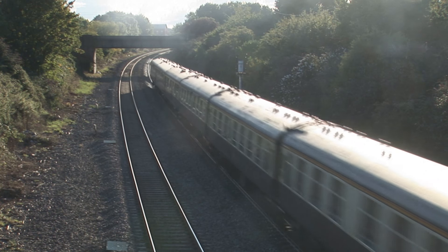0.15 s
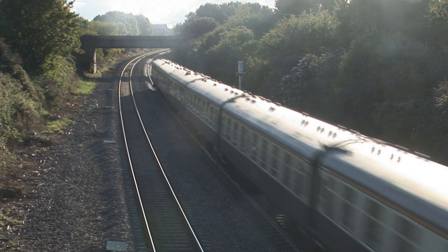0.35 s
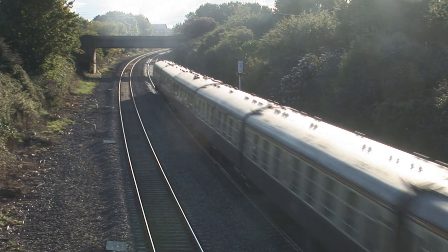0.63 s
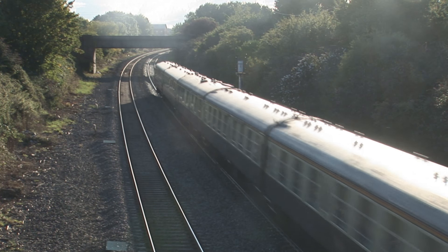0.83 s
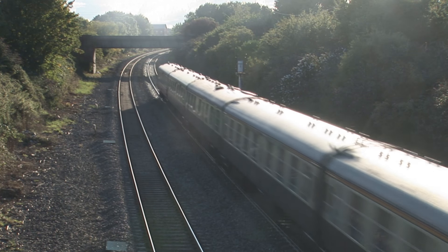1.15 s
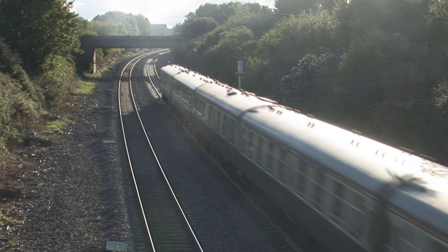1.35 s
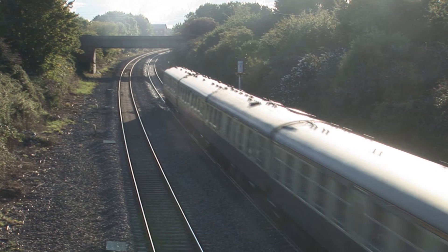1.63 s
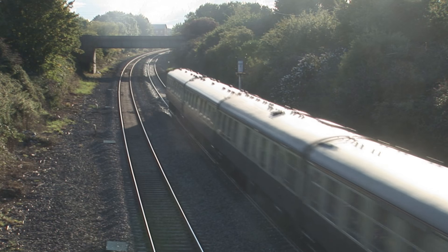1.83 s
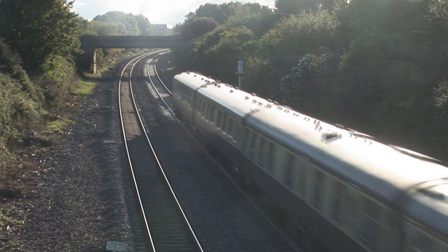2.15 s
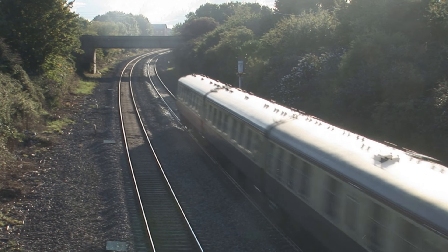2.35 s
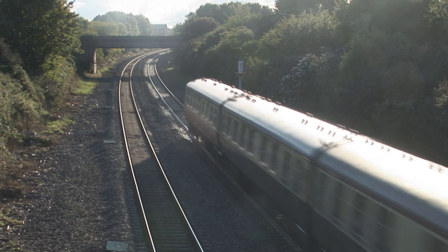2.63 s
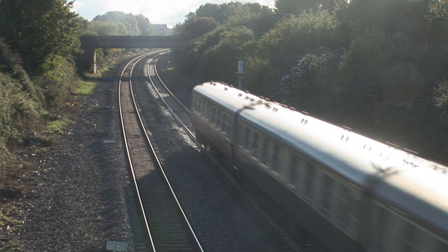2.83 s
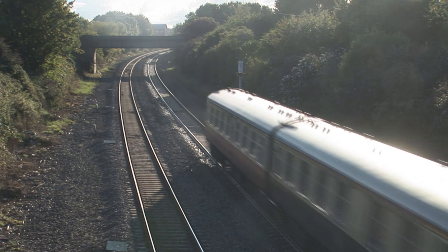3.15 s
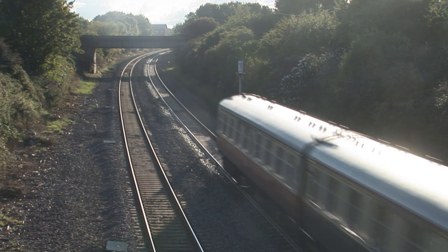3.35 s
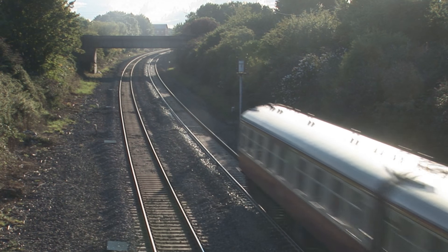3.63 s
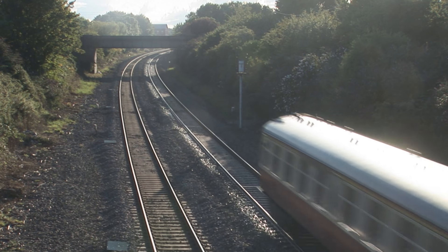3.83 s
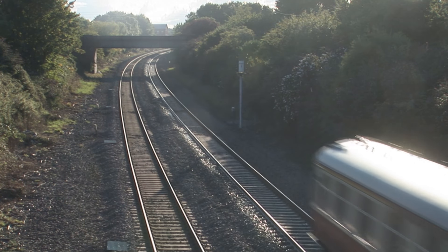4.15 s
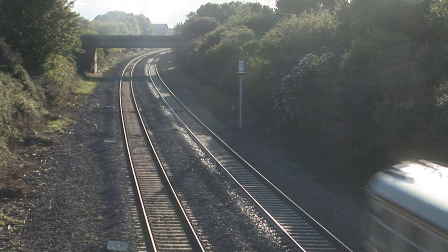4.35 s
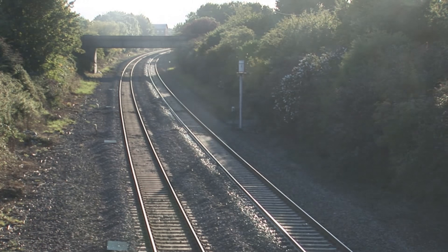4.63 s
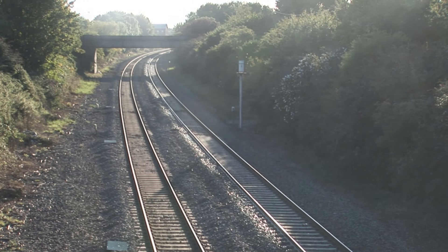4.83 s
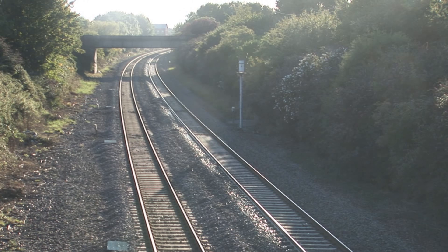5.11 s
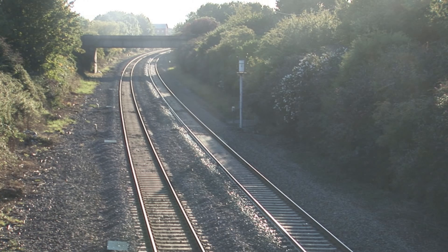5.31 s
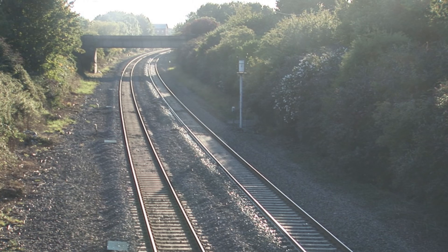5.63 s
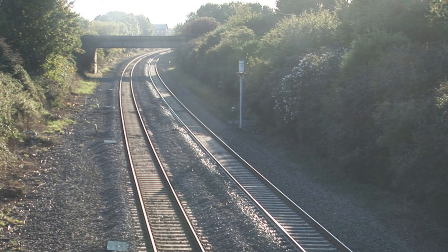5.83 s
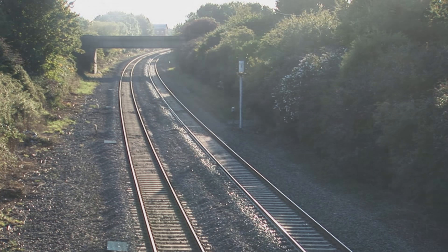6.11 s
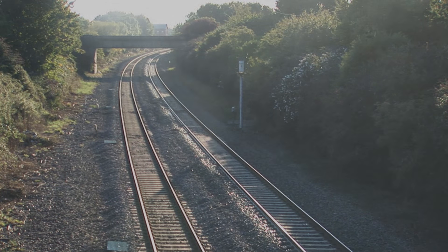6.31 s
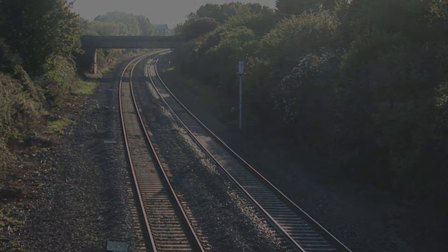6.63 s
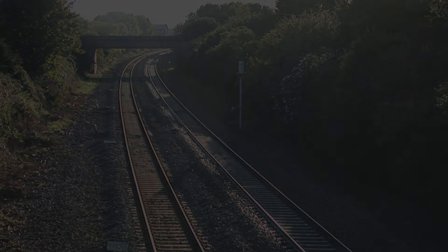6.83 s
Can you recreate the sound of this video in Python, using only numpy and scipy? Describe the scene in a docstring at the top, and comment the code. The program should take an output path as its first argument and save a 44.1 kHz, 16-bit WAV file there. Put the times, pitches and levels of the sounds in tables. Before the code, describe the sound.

From 0 s, already at full strength, coaches rush by just below: a dense, mid-heavy roar of steel wheels on rail, slightly gritty, with no whistle. It swells softly in close pairs as bogies pass, about every 0.8 s, near 0.3 and 0.5, 1.1 and 1.3, 1.9 and 2.1, 2.5 and 2.8, 3.3 and 3.5, 4.1 and 4.3, and 4.8 and 5.0 s. Narrow metallic tones ring up and fade as individual wheels pass. Beneath is a low, blurred engine throb. Tiny high pings sound right of centre at 1.0-1.3 s. Low air gusts buffet the microphone from about 3.5 s. After 5 s the roar drops and dulls quickly; by 5.7 s rapid steam puffs, about seventeen a second with uneven accents and short low booms, stand out over a distant train wash, which weakens towards 7 s.

```python
"""The last coaches of a steam train rush past below the listener and run off along a wooded cutting.
From the start, shaped noise roars as the wheels, swelling as bogies pass; narrow bands sing as single wheels.
Under it the distant engine throbs in rippled low noise, and air buffets in gusts; decaying sines ping near 1 s.
After about 5 s the roar falls away over a wash of distant train, and the engine's quick exhaust beats stand out:
puffs of shaped noise, each with a short low boom."""
import sys
import numpy as np
from scipy import signal
from scipy.fft import irfft, next_fast_len
from scipy.io import wavfile
from scipy.ndimage import uniform_filter1d

SR = 44100
rng = np.random.default_rng(int(sys.argv[2]) if len(sys.argv) > 2 else 0)


def inscribe(sig):
    """Save sig as 16-bit PCM at rate SR to the path in sys.argv[1].

    A 1-D sig is mono; a 2-D sig holds one channel per row.
    Samples are clipped to [-1, 1] before scaling.
    """
    pcm = np.round(np.clip(np.atleast_2d(sig).T, -1, 1) * 32767)
    wavfile.write(sys.argv[1], SR, pcm.astype(np.int16))


N = 307377
TIME = np.arange(N) / SR


def gain_of(db):
    """Decibels to amplitude."""
    return 10 ** (np.asarray(db) / 20)


def evened(x):
    """Scales to rms 1."""
    return x / np.sqrt(np.mean(x ** 2) + 1e-20)


def read(points, hz):
    """A spectrum table, joined on a log-frequency axis."""
    f, value = np.transpose(points)
    return np.interp(np.log(hz + 1), np.log(f + 1), value)


def follow(rows, t, axis=1):
    """One column of a curve at the times t."""
    rows = np.asarray(rows)
    return np.interp(t, rows[:, 0], rows[:, axis])


def swells(rows, t, half_s, axis=1):
    """Bell-shaped rises (or dips) in dB, one for each row, centred on its time."""
    rows = np.asarray(rows)
    bells = np.exp(-((t[..., None] - rows[:, 0]) / half_s) ** 2)
    return (rows[:, axis] * bells).sum(-1)


def resonance(hz, centre_hz, width_hz):
    """Resonance bump with a peak of 1, falling to one half at half the width either side."""
    return 1 / (1 + (2 * (hz - centre_hz) / width_hz) ** 2)


def slow_chance(count, size):
    """A smooth random drift of rms 1, as a column."""
    drift = uniform_filter1d(rng.standard_normal(count), size)
    return evened(uniform_filter1d(drift, size))[:, None]


def patches(shape, size):
    """Smooth chance over time and frequency, of rms 1."""
    over_time = uniform_filter1d(rng.standard_normal(shape), size[0], 0)
    return evened(uniform_filter1d(over_time, size[1], 1))


def port_pair(shape, likeness, phase=0, balance_db=0):
    """Random spectra for left and right that are partly alike."""
    a, b, c, d = rng.standard_normal((4, *shape))
    same = np.clip(likeness, 0, 1)
    left = a + 1j * b
    right = same * left + np.sqrt(1 - same ** 2) * (c + 1j * d)
    right = right * np.exp(-1j * phase)
    return np.array([left * gain_of(balance_db / 2), right * gain_of(-balance_db / 2)])


def noise(colour, likeness, phase, balance_db):
    """Steady two-channel noise of rms 1 from tables of colour, likeness and phase."""
    size = next_fast_len(N, True)
    hz = np.fft.rfftfreq(size, 1 / SR)
    z = port_pair(hz.shape, read(likeness, hz), read(phase, hz), balance_db)
    return evened(irfft(z * gain_of(read(colour, hz)), size)[:, :N])


def rumble(colour, level_db, likeness, size):
    """Low noise whose slow swell follows a level; its quick flutter stays random."""
    x = noise(colour, [(0, likeness)], [(0, 0.0038)], balance_db=0.0)
    slow_power = uniform_filter1d(uniform_filter1d((x ** 2).mean(0), size), size)
    return x / np.sqrt(slow_power) * gain_of(level_db)


# colour of wheels on rail: [f/Hz, relative level in each Hz/dB]
ROLL_COLOUR = [(20, -27.5), (90, -13.5), (320, -11.5), (450, -3), (1100, -1.5), (1650, -12.5),
               (2300, -10.5), (3150, -14), (4400, -25.5), (5250, -32.5), (5750, -20), (6600, -37),
               (7500, -39.5), (15500, -41.5)]
# steady roar of the coaches, falling away behind the last: [t/s, level/dB, treble lift before band weighting/dB]
COACHES = [(0, -20.5, -1), (0.85, -20, 0.5), (1.6, -19.9, 1.5), (2.35, -18.5, -3), (3.1, -19.5, 1),
           (3.75, -19.5, -2.5), (4.65, -21, 0), (5.0, -21.5, -0.5), (5.22, -26, -6), (5.48, -26, -7.5),
           (5.75, -30, -8), (6.0, -33, -8), (6.97, -36, -14)]
# pairs of bogies, one either side of a coupling: [t/s, swell/dB, treble lift before band weighting/dB]
BOGIES = [(.29, 2.3, 0.3), (.53, 1.6, 1.5), (1.08, 0.4, 2.5), (1.32, 1.5, 1.5), (1.88, 0.5, 1.5),
          (2.1, 0.8, -0.5), (2.53, 1.1, 1), (2.8, 2.5, 0.5), (3.27, 0, 1.5), (3.48, 1.4, 1.4), (4.07, 1, 2),
          (4.3, 1, 2), (4.8, -0.3, 0), (5.02, 0.8, -2.5)]
BOGIE_S = .125  # from the peak of a swell to 1/e of its dB
# the two microphone ports, likeness: [f/Hz, likeness 0-1]
PORT_LIKENESS = [(200, 0.99), (500, 0.71), (900, 0.54), (1200, 0.68), (1500, 0.25), (1950, 0.88),
                 (3300, 0.96), (4000, 0.45), (5250, 0.38), (5700, 0.91), (6600, 0.82), (9000, 0.5),
                 (12000, 0.3), (15500, 0.3)]
# the two ports, phase: [f/Hz, lead of left/radians]
PORT_PHASE = [(250, -.1), (620, -.8), (1200, -.7), (1450, -.9), (1700, .1), (3550, -.2), (4200, -1.8),
              (4700, -1.7), (5100, -.7), (5500, -3.1), (9300, -3.6), (10300, -6), (13500, -5.5),
              (15500, -6.3)]
# the two ports, balance: [f/Hz, left minus right/dB]
PORT_BALANCE = [(250, 0), (550, 1), (900, -2.5), (1250, -4), (1500, -4), (2000, -4.5), (2500, -0.5),
                (3200, -0.5), (3700, 4.5), (4500, -0.5), (6500, 0), (9000, -1.5), (12000, -2.5),
                (15500, -1)]


def wheels(patchy_db, streak_db, rattle_db, doppler, wander, waver, grit_db):
    """Rough treads on rough rail: a wide roar, lifted at the resonances of wheel and rail."""
    size, hop = 1024, 256
    t = np.arange(N // hop + 5)[:, None] * hop / SR
    hz = np.fft.rfftfreq(size, 1 / SR)
    shape = (len(t), len(hz))
    field_db = read(ROLL_COLOUR, hz) + patchy_db * patches(shape, size=(10, 8))
    # loose running gear shakes wide bands together
    field_db += rattle_db * patches(shape, size=(3, 90))
    field_db += wheel_resonances(t, hz, doppler, wander, waver)
    field_db += wheel_song(t, hz)
    field_db += midrange_flares(t, hz)
    # rough spots on the rail set short, narrow streaks ringing
    streak_weight = read([(300, 0.2), (500, 0.72), (3000, 0.73), (5000, 0.22)], hz)
    field_db += streak_db * streak_weight * patches(shape, size=(22, 2))
    # each set of bogies has its own brightness; the roar dulls as the train leaves
    treble_db = follow(COACHES, t, axis=2) + swells(BOGIES, t, BOGIE_S, axis=2)
    field_db += read([(1200, 0.068), (2400, 0.86), (5000, 0.27), (9000, 0.13)], hz) * treble_db
    z = port_pair(shape, read(PORT_LIKENESS, hz), read(PORT_PHASE, hz), read(PORT_BALANCE, hz))
    z = z * gain_of(field_db)
    roar = signal.istft(z, nperseg=size, noverlap=size - hop, time_axis=1, freq_axis=2)[1][:, :N]
    # pits in tread and rail roughen the roar from millisecond to millisecond
    roar = roar * gain_of(grit_db * slow_chance(N, size=50).T)
    return evened(roar) * gain_of(follow(COACHES, TIME) + swells(BOGIES, TIME, BOGIE_S))


# wheel and rail resonances, lifts before ring and waver:
# [f/Hz, width/Hz, lift under mid-train/dB, lift at the last coach/dB]
WHEEL_MODES = [(274, 47, 7.5, 1.5), (415, 130, 2, -3), (654, 31, 1.5, 5.5), (891, 88, 6.5, 3),
               (1075, 110, -3, 2.5), (1390, 120, 8, -5.5), (1923, 230, 5, 8), (2526, 116, 7, 5),
               (2800, 160, 4, -5), (2974, 100, 6, 5), (3280, 79, 3, 7), (3960, 250, 2.5, 5.5),
               (5040, 380, 6, 7)]
# how far the end of the train has taken over, and how clearly its wheels ring: [t/s, share 0-1, ring 0-1]
LAST_COACH = [(0, 0.14, 0.9), (2.4, 0.37, 0.86), (3.3, 0.45, 1), (4.0, 1, 0.88), (4.4, 0.93, 0.98),
              (5.0, 0.66, 0.92), (5.3, 1, 0.52), (6.0, 0.24, 1)]


def wheel_resonances(t, hz, doppler, wander, waver):
    """Lift in dB where wheels and rail ring, gliding from the mid-train balance to the last coach's."""
    last = np.clip(follow(LAST_COACH, t), 0, 1)
    ring = np.clip(follow(LAST_COACH, t, axis=2), 0, 1)
    total_db = 0
    for mode_hz, width_hz, middle_db, end_db in WHEEL_MODES:
        # the pitch sinks as the last wheels draw level
        heard_hz = mode_hz * (1 - doppler * last)
        # mid-train, many differently tuned wheels take turns
        heard_hz = heard_hz * (1 + wander * (1 - last) * slow_chance(len(t), size=30))
        lift_db = ring * (middle_db + last * (end_db - middle_db))
        lift_db = lift_db * (1 + waver * (1 - last) * slow_chance(len(t), size=18))
        total_db = total_db + lift_db * resonance(hz, heard_hz, width_hz)
    return total_db


# exhaust: four beats to a turn of the driving wheels, slowly gathering speed
BEATS_PER_S, SPEED_UP_PER_S2, LEAD_BEAT_S = 17.13, .026, 5.694


def beat_count():
    """Exhaust beats counted from a leading beat; whole numbers are the strokes."""
    t = TIME - LEAD_BEAT_S
    return BEATS_PER_S * t + .5 * SPEED_UP_PER_S2 * t ** 2


# colour of the engine's low throb, smeared by the cutting: [f/Hz, relative level in each Hz/dB]
DRONE_COLOUR = [(70, -15), (110, -18), (145, -9.5), (178, -1), (210, -3.1), (240, -8), (280, -16.5),
                (450, -33), (1000, -82)]
# how the engine carries up the cutting, puffs and thumps before accents, thumps also before carry:
# [t/s, puff level/dB, thump level/dB, blurred boom level before ripple/dB]
ENGINE = [(0, -47, -48, -31.5), (2, -29, -26, -36), (3.6, -35, -38, -35.5), (5.5, -32.5, -38, -34.5),
          (5.64, -36, -46, -41), (5.72, -32, -33, -36), (6.45, -37, -40, -37.5), (6.97, -37, -42, -40)]
# accents of the four beats of a turn: [level/dB]
ACCENTS_DB = [1, -5.5, -6, -6]


def drone(throb=0.089, lope=0.068, delay_s=0.0095, lope_delay_s=0.064):
    """The engine's boom, blurred by echoes so that each beat and each turn of the wheels only ripples it."""
    beats = beat_count()
    ripple = 1 + throb * np.cos(2 * np.pi * (beats - BEATS_PER_S * delay_s))
    turns = (beats - BEATS_PER_S * lope_delay_s) / len(ACCENTS_DB)
    ripple += lope * np.cos(2 * np.pi * turns)
    return evened(ripple) * rumble(DRONE_COLOUR, follow(ENGINE, TIME, axis=3), likeness=1.0, size=7000)


def stroke(rise_s, fall_s):
    """The swell of one piston stroke: it opens quickly and dies away, with a peak of 1."""
    t = TIME[:SR // 5]
    swell = (1 - np.exp(-(t / rise_s) ** 2)) * np.exp(-t / fall_s)
    return swell / swell.max()


def strokes(rows, rise_s, fall_s):
    """A train of swells, one for each stroke (t/s, level/dB); where they overlap the louder wins."""
    swell, out = stroke(rise_s, fall_s), np.zeros(N + SR)
    for s, db in rows:
        part = out[round(s * SR):][:len(swell)]
        part[:] = np.maximum(part, gain_of(db) * swell)
    return out[:N]


THUMP_RISE_S, THUMP_FALL_S = 0.0095, 0.018


def booms(rows, carry_db):
    """Each boom (t/s, level before carry/dB, f/Hz) is a few cycles of a low tone under the swell of a stroke."""
    swell, out = stroke(THUMP_RISE_S, THUMP_FALL_S), np.zeros(N + SR)
    start_turns = rng.random(len(rows))
    for (s, db, hz), turn in zip(rows, start_turns):
        start = round(s * SR)
        tone = np.sin(2 * np.pi * (hz * TIME[:len(swell)] + turn))
        out[start:start + len(swell)] += gain_of(db + carry_db) * swell * tone
    return out[:N]


# colour of a puff: [f/Hz, relative level in each Hz/dB]
CHUFF_COLOUR = [(300, -15), (700, -6), (1200, 4.5), (1750, 4.5), (2400, -2.5), (3150, -8), (3900, -29),
                (6000, -37), (8000, -65), (15000, -55)]
# single puffs that bark out above the rest: [t/s, level/dB]
BARKS = [(5.694, -29.5), (5.752, -36), (5.866, -34), (5.927, -33), (5.982, -35), (6.104, -29),
         (6.164, -28.5), (6.219, -31.5), (6.396, -30.5), (6.452, -33.5), (6.563, -34), (6.624, -32),
         (6.685, -34.5), (6.744, -36), (6.802, -36), (6.858, -34.5), (6.916, -36)]
# single booms that stand out of the throb: [t/s, level before carry/dB, f/Hz]
BOOMS = [(0.297, -26, 180), (0.346, -27, 210), (0.46, -28, 180), (0.527, -28, 208), (0.833, -22, 179),
         (1.188, -21, 183), (1.887, -21, 196), (1.966, -20, 195), (2.007, -22, 177), (2.052, -25, 199),
         (2.406, -24, 210), (2.757, -20, 188), (2.888, -28, 186), (3.874, -21, 188), (4.136, -23, 186),
         (4.375, -24, 229), (5.283, -24, 178), (5.696, -20.5, 189), (5.753, -21, 176), (5.805, -29, 180),
         (5.867, -26.5, 201), (5.931, -30, 215), (5.987, -28, 172), (6.03, -27, 212), (6.161, -25, 179),
         (6.226, -22.5, 187), (6.298, -28, 180), (6.342, -25, 178), (6.391, -23.5, 192),
         (6.441, -26.5, 178), (6.466, -29, 204), (6.562, -23, 179), (6.748, -24, 208), (6.777, -27, 188),
         (6.927, -31, 187), (6.952, -26, 180)]
# sound from straight down the line, also used by the distant train: [f/Hz, likeness 0-1]
AHEAD_LIKENESS = [(250, 0.68), (600, 0.43), (950, 0.24), (1400, 0.85), (3000, 1), (3800, .3), (5000, 0.31),
                  (5700, 0.94), (8000, 0.48), (15000, .4)]
# its phase between the ports: [f/Hz, lead of left/radians]
AHEAD_PHASE = [(300, 1), (650, 0.4), (1300, 0.33), (3600, 0), (4300, -0.5), (5500, -2), (9300, 5),
               (10300, -5), (15000, -6.5)]
PUFF_RISE_S, PUFF_FALL_S = 0.0097, 0.031


def exhaust(thump_hz=190, pitch_spread=0.068, uneven_db=3.5):
    """Steam puffs from the chimney four times a turn, and each puff booms briefly at its own low pitch."""
    beat = np.floor(beat_count()).astype(int)
    starts = np.flatnonzero(np.diff(beat)) + 1
    s = TIME[starts]
    strength, pitch = rng.standard_normal((len(s), 2)).T
    accent_db = np.take(ACCENTS_DB, beat[starts], mode="wrap") + uneven_db * strength
    puffs = list(zip(s, follow(ENGINE, s) + accent_db)) + list(BARKS)
    thump_db = follow(ENGINE, s, axis=2) + accent_db
    thumps = list(zip(s, thump_db, thump_hz * (1 + pitch_spread * pitch))) + list(BOOMS)
    steam = noise(CHUFF_COLOUR, AHEAD_LIKENESS, AHEAD_PHASE, balance_db=-1.5)
    return steam * strokes(puffs, PUFF_RISE_S, PUFF_FALL_S) + booms(thumps, carry_db=-3.5)


# colour of the train far down the line, with faint wheel tones: [f/Hz, relative level in each Hz/dB]
FAR_COLOUR = [(150, -9), (280, -10), (335, -17), (380, -5), (500, -6.5), (555, -12), (630, -1), (710, -9),
              (900, 0.5), (1015, 0.5), (1065, -1), (1120, -9), (1220, -0.5), (1420, -8), (1630, -4.5),
              (1720, 1), (1800, -4), (1950, -4), (2130, -7), (2600, -8.5), (2980, -10.5), (3150, -12.5),
              (3800, -32), (5000, -26), (5700, -28.5), (7500, -50), (9800, -32.5), (11500, -29.5),
              (12400, -34.5), (14400, -36), (15300, -50)]
# wash of the distant train: [t/s, level/dB]
DISTANT = [(0, -54), (5, -37), (5.7, -34.5), (6.2, -34.5), (6.5, -35.5), (6.97, -42)]


def distant_train():
    """The rest of the train, a smooth wash from down the cutting."""
    wash = noise(FAR_COLOUR, AHEAD_LIKENESS, AHEAD_PHASE, balance_db=-1.0)
    return wash * gain_of(follow(DISTANT, TIME))


# colour of the air buffeting the microphone: [f/Hz, relative level in each Hz/dB]
BUFFET_COLOUR = [(10, -22), (22, -12), (36, -6), (75, -6), (110, -3), (200, -12), (600, -73)]
# steady draught at the microphone, before gusts: [t/s, level/dB]
DRAUGHT = [(0, -71), (2.2, -63), (3.3, -54.5), (5.9, -43.5), (6.97, -51)]
# gusts (and a lull) in the wake of the train: [t/s, swell/dB, peak to 1/e of its dB/s]
GUSTS = [(.25, -4, .15), (3.48, 11, .08), (4.16, 12, 0.13), (4.836, 11, 0.069), (5.318, 9, 0.066),
         (5.88, 4, 0.061)]


def buffet():
    """Air dragged along by the train pushes on the microphone, with a few gusts."""
    level_db = follow(DRAUGHT, TIME) + swells(GUSTS, TIME, np.asarray(GUSTS)[:, 2])
    return rumble(BUFFET_COLOUR, level_db, likeness=.6, size=8000)


# single wheels as they go by, each at its own pitch: [t/s, peak to 1/e of its dB/s, f/Hz, width/Hz, lift/dB]
SINGS = [(.35, 0.21, 1930, 120, -1), (.5, 0.24, 845, 60, 3), (.6, 0.23, 612, 45, 2.5),
         (1.25, 0.21, 480, 45, 4.5), (1.2, 0.17, 1360, 80, 6), (1.22, .2, 2540, 110, 1),
         (1.735, 0.09, 1420, 80, 12), (1.952, 0.29, 1980, 130, 6), (1.967, .15, 640, 65, 6.5),
         (2.297, 0.5, 290, 45, 4.5), (2.608, 0.14, 615, 80, 5), (2.644, 0.24, 2010, 130, 5),
         (2.82, 0.3, 2520, 110, 3.5), (2.83, 0.14, 940, 60, 2), (3.3, 0.16, 1420, 70, 7),
         (3.3, .3, 915, 120, 3.5), (3.424, 0.18, 1940, 110, 5.5), (4.016, 0.11, 1850, 110, 7.5),
         (4.196, 0.18, 655, 42, 7), (4.28, .17, 1870, 110, 6), (4.25, 0.36, 896, 42, 6.5),
         (4.267, 0.084, 2630, 80, 4), (4.753, 0.14, 1910, 90, 9.5), (4.955, 0.35, 634, 45, 8)]


def wheel_song(t, hz):
    """Lift in dB of the narrow bands in which single wheels ring up and die away as they pass."""
    total_db = 0
    for s, half_s, ring_hz, width_hz, db in SINGS:
        total_db = total_db + swells([(s, db)], t, half_s) * resonance(hz, ring_hz, width_hz)
    return total_db


# brief flares (one a dip) in the middle of the roar: [t/s, lift/dB]
FLARES = [(.272, -2), (.457, 4), (.618, 3), (.733, 5), (1.246, 4), (3.914, 5.5), (4.147, 5), (4.385, 6.5),
          (4.484, 6), (4.771, 3.5), (4.872, 5.5), (4.936, 2.5), (5.034, 1), (5.148, 0), (5.341, 0)]
FLARE_S, FLARE_HZ, FLARE_WIDTH_HZ = 0.0053, 940, 1600  # peak to 1/e of its dB, centre, width


def midrange_flares(t, hz):
    """Lift in dB of a broad middle band that jumps for a few milliseconds."""
    return swells(FLARES, t, FLARE_S) * resonance(hz, FLARE_HZ, FLARE_WIDTH_HZ)


# small bright pings: [t/s, level before mode levels/dB, extra on the lowest mode/dB]
PINGS = [(1.013, -54, -37), (1.0575, -37.5, 1), (1.1737, -38, -12), (1.2624, -49, -24)]
# their modes: [f/Hz, level relative to the ping/dB, t60/s]
PING_MODES = [(9410, 1.5, .1), (12280, -0.5, 0.13), (12965, -4, .1), (14740, -2.5, .11)]


def pings(left_db=-11.0):
    """A small hard object is struck and rings high in decaying sines, off to the right."""
    out = np.zeros(N)
    t = TIME[:SR // 4]
    for s, db, lowest_db in PINGS:
        start = round(s * SR)
        for k, (hz, mode_db, t60) in enumerate(PING_MODES):
            ring = np.sin(2 * np.pi * hz * t) * np.exp(-np.log(1000) * t / t60)
            out[start:start + len(t)] += gain_of(db + mode_db + lowest_db * (k == 0)) * ring
    return np.array([gain_of(left_db) * out, out])


def scene():
    """Near wheels, far train and engine, moving air at the microphone, and pings."""
    roar = wheels(patchy_db=0.46, streak_db=0.97, rattle_db=0.4, doppler=0.0089,
                  wander=0.021, waver=0.29, grit_db=0.37)
    return roar + drone() + exhaust() + distant_train() + buffet() + pings()


EDGE_HZ = 15800


def record(dry):
    """The recorder's band limit: a steep low-pass."""
    low_pass = signal.firwin(511, EDGE_HZ, window=("kaiser", 9), fs=SR)
    return signal.oaconvolve(dry, low_pass[None], "same")


dry = scene()
out = record(dry)
inscribe(out)
```